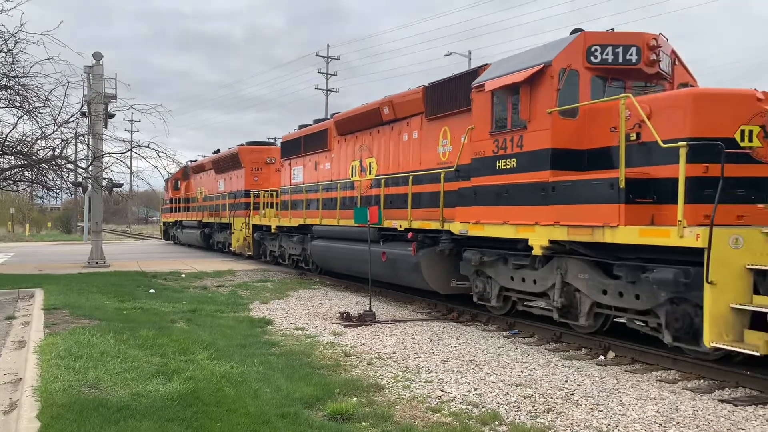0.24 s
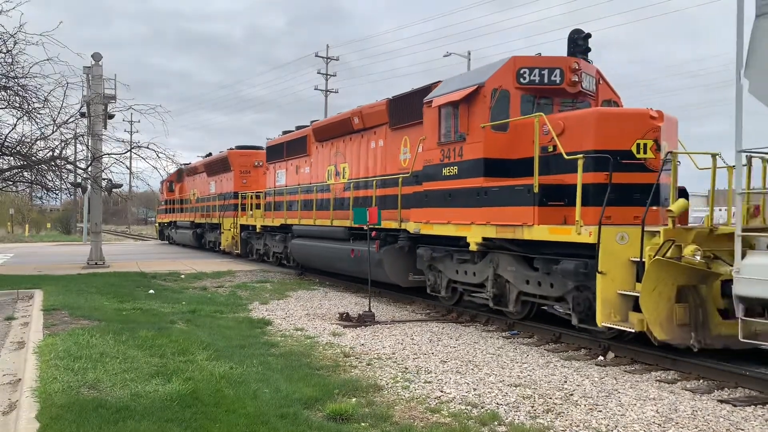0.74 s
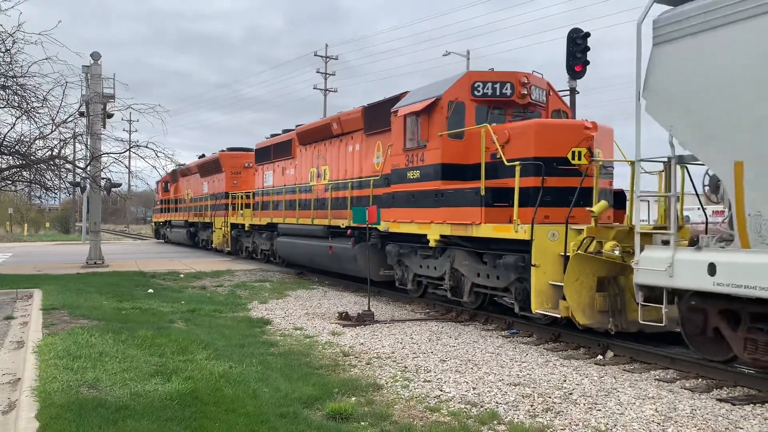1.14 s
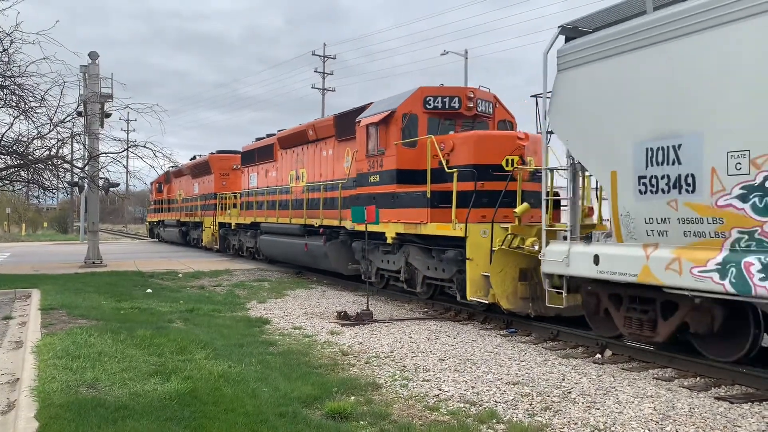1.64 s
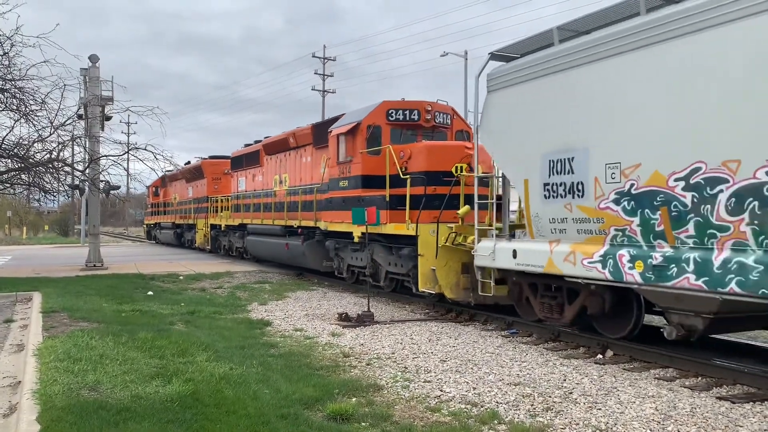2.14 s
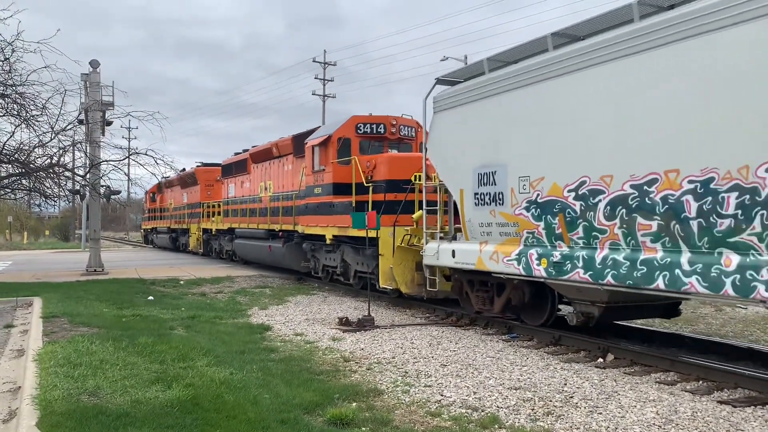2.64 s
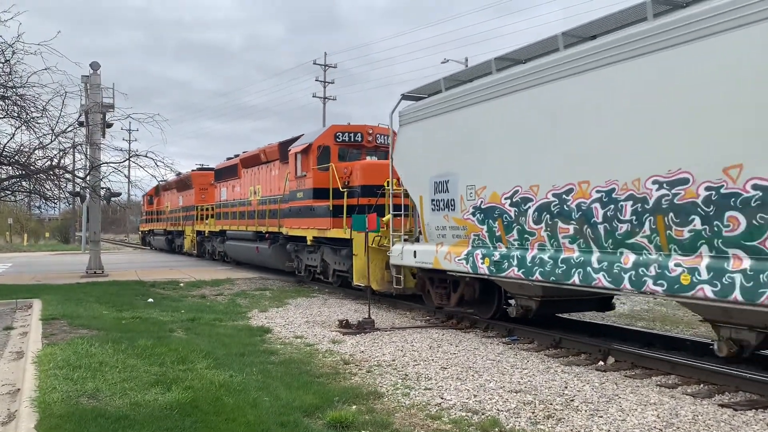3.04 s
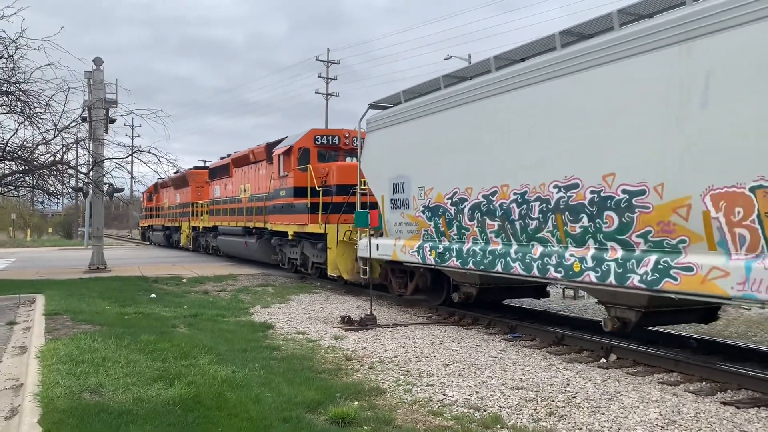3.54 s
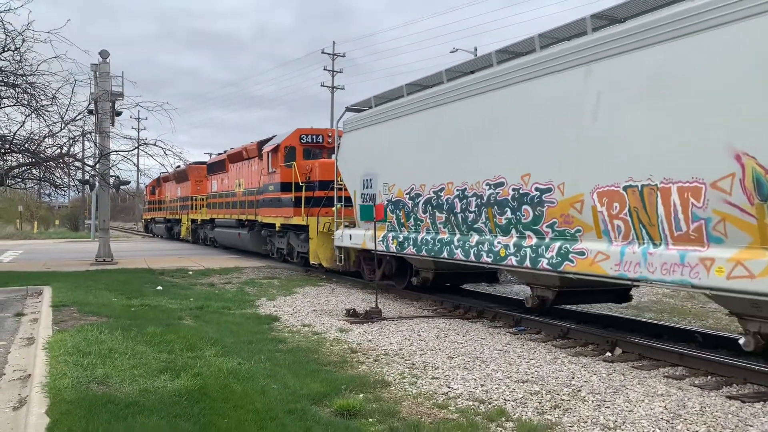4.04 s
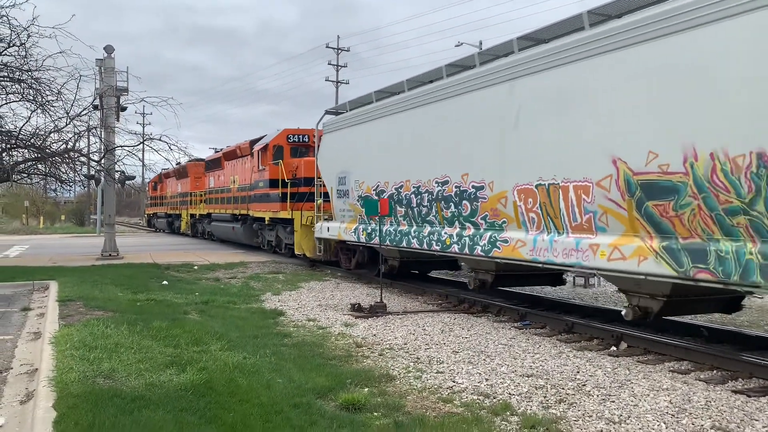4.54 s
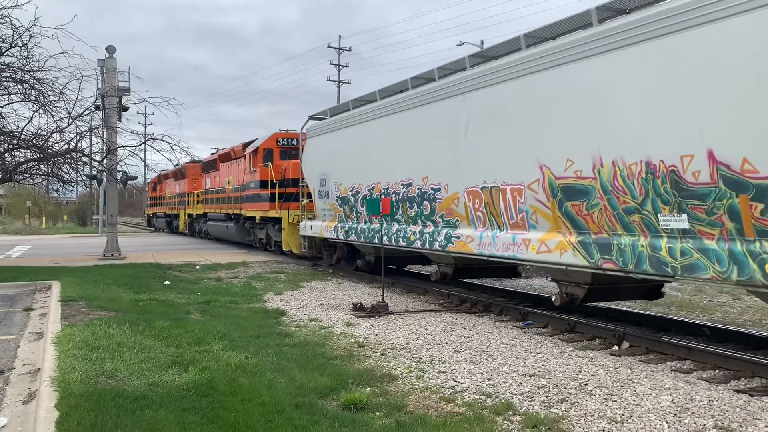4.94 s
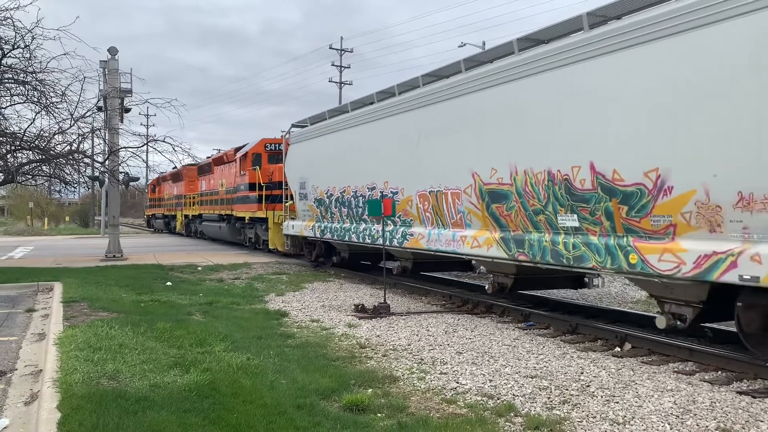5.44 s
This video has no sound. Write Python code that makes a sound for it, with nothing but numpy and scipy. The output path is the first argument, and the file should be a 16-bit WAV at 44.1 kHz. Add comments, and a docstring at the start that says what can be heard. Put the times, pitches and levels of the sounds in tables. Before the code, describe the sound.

Deep pulsing engine drone and rumble beside a railway line, hissing air, then freight wagon wheels clanking and briefly squeaking as they roll by.

```python
"""Slow freight train pulling away

Two diesel locomotives pull a slow freight train over a level crossing, heard from the grass beside the line.
The exhaust throbs as sines on two neighbouring crank orders, echoed off a wagon side; gears and motors add tones.
Shaped noise makes the rumble, rolling, leaking air, blower whistle and valve spits.
Wagon wheels knock over rail joints, setting steel modes ringing; flanges squeak and the wagon body hums.
Two microphone ports share part of the sound, less or more of it as the wagon takes over from the engines."""
import sys
import numpy as np
from scipy import signal
from scipy.fft import rfft, irfft
from scipy.io import wavfile
from scipy.ndimage import uniform_filter1d

SR = 44100
rng = np.random.default_rng(int(sys.argv[2]) if len(sys.argv) > 2 else 0)


def wav_out(sig):
    """Save sig, one row per channel (or a flat mono array), as 16-bit PCM at SR to the path in sys.argv[1]."""
    wavfile.write(sys.argv[1], SR, np.round(np.clip(np.atleast_2d(sig).T, -1, 1) * 32767).astype(np.int16))


N = 251811
T = np.arange(N) / SR  # time [s]
CRANK_HZ = 9.4047  # first engine


def gain_of(db):
    """Amplitude factor of a level in dB."""
    return 10 ** (np.asarray(db) / 20)


def evened(x):
    """Scale to an rms of one."""
    return x / np.sqrt(np.mean(x ** 2) + 1e-20)


def read(points, hz):
    """Read a table over frequency, straight between points on a logarithmic frequency axis."""
    f, value = np.transpose(points)
    return np.interp(np.log(hz + 1), np.log(f + 1), value)


def curve(rows, column):
    """Spread one column of a timed table over the whole scene."""
    columns = np.transpose(rows)
    return np.interp(T, columns[0], columns[column])


def add(mix, s, sound):
    """Lay a sound into the mix at s seconds, cut off at the end of the scene."""
    part = mix[..., round(s * SR):][..., :sound.shape[-1]]
    part += sound[..., :part.shape[-1]]


def drift(top_hz):
    """Slow chance: sines of random phase up to top_hz, rms one."""
    coarse = T[::64]
    rates = top_hz * np.geomspace(.1, 1, num=12)
    slow = sum(np.sin(2 * np.pi * (f * coarse + rng.random())) for f in rates)
    return np.interp(T, coarse, evened(slow))


def noise(gain, patchy_db, flicker_db, size=512):
    """Two unrelated noises from random short-time spectra, with shared patches and frame-wide flicker."""
    frames, hz = N // (size // 4) + 5, np.fft.rfftfreq(size, 1 / SR)
    shape = (2, frames, len(hz))
    spectra = rng.standard_normal(shape) + 1j * rng.standard_normal(shape)
    patches = uniform_filter1d(rng.standard_normal((frames, len(hz))), size=12, axis=0)
    patches = evened(uniform_filter1d(patches, size=6, axis=1))
    flicker = evened(uniform_filter1d(rng.standard_normal((frames, 1)), size=4, axis=0))
    spectra = spectra * gain(hz) * gain_of(patchy_db * patches + flicker_db * flicker)
    sound = signal.istft(spectra.transpose(0, 2, 1), nperseg=size, noverlap=3 * size // 4)[1]
    return evened(sound[:, :N])


def tone(db, cycles):
    """A turning phasor whose real part is a steady tone."""
    return gain_of(db) * np.exp(2j * np.pi * cycles)


def at_ports(phasor, leads, louder):
    """Give the right port's unshared part a share that leads the left and a share that is louder."""
    return np.array([phasor.real, leads * phasor.real + louder * phasor.imag])


def exhaust():
    """Sines on crank orders: the strong two beat once per turn and meet a growing echo; a second engine slips past."""
    # strong tones: (time [s], echo of eighth order [dB], echo of ninth order [dB],
    # second engine [dB], second engine crank speed [Hz])
    strong = [(0.0, -51.4, -54.6, -37.2, 9.524), (1.2, -41.0, -55.0, -37.7, 9.54),
              (2.0, -31.4, -47.5, -29.6, 9.476), (2.6, -25.2, -34.8, -43.9, 9.4),
              (3.1, -20.0, -27.7, -39.0, 9.462), (3.5, -18.5, -26.7, -32.5, 9.522),
              (4.1, -17.3, -25.1, -45.0, 9.455), (4.7, -18.2, -24.1, -26.3, 9.507),
              (5.2, -17.9, -23.8, -26.7, 9.474), (5.71, -15.4, -23.3, -22.1, 9.4)]
    # weaker tones: (multiple of the crank speed, level at start [dB], in the middle [dB], at the end [dB])
    orders = [(5, -54, -52, -50), (6, -53, -43, -44), (7, -47, -42, -41), (10, -48, -45, -47),
              (11, -53, -43, -50), (12, -55, -48, -53), (13, -56, -53, -57), (14, -58, -49, -42),
              (15, -62, -50, -49), (16, -49, -47, -46), (17, -51, -51, -48), (18, -60, -54, -52),
              (19, -57, -56, -54), (20, -49, -51, -45), (23, -59, -58, -53), (24, -54, -56, -55),
              (27, -60, -58, -60), (30, -54, -54, -56)]
    eighth_db, ninth_db = -28.5, -28.7  # heard directly
    ninth_lead, orders_lead = .075, .1  # cycles
    locked_up_to = 10  # the pipes scatter the timing of orders above this one
    echo_s, echo_s_per_s = .0022, .0012  # the detour by the wagon side lengthens
    second_lag = .602  # crank turns behind the first engine

    direct = CRANK_HZ * T
    echo = CRANK_HZ * (T - echo_s - echo_s_per_s * T)
    second = np.cumsum(curve(strong, 4)) / SR - second_lag
    from_engine = tone(eighth_db, 8 * direct) + tone(ninth_db, 9 * direct + ninth_lead)
    from_wagon = tone(curve(strong, 1), 8 * echo) + tone(curve(strong, 2), 9 * echo + ninth_lead)
    from_second = tone(curve(strong, 3), 8 * second)
    out = at_ports(from_engine, leads=-.3, louder=.6)
    out = out + at_ports(from_wagon, leads=.8, louder=.25)
    out = out + at_ports(from_second, leads=.9, louder=.6)
    for order, *levels_db in orders:
        lead = orders_lead if order <= locked_up_to else rng.random()
        level_db = np.interp(T, [0, T[-1] / 2, T[-1]], levels_db) + 2.5 * drift(top_hz=1.3)
        cycles = order * echo + lead + 0.088 * drift(top_hz=1.296)
        out = out + gain_of(level_db) * np.cos(2 * np.pi * cycles)
    return np.sqrt(2) * out  # the levels are rms


def roar():
    """Shaped noise for engine rumble, the rolling of steel on steel with its fine hiss, and leaking brake air."""
    # spectra, each of them: (frequency [Hz], relative density [dB per Hz])
    rumble_colour = [(30, -43), (60, 4.5), (120, -3), (200, -1), (350, -3.5), (500, -7.5), (900, -37),
                     (2000, -52.5)]
    rolling_colour = [(200, -15), (500, -10), (700, -0.5), (1000, -0.5), (1500, -7.5), (2000, -9),
                      (2700, -12.5), (3200, -14.5), (5000, -29)]
    hiss_colour = [(1500, -1), (3000, 2.5), (4600, 3), (6000, -6.5), (7500, 1), (10000, -54), (14000, -24)]
    leak_colour = [(6000, -75), (9500, -8.5), (11000, -10), (13000, -18), (14500, -22), (15200, -14),
                   (15700, -0.5)]
    # rolling noise swells as each set of wheels passes: (time [s], level [dB])
    wheels_passing = [(0, -48.5), (.54, -47.5), (.9, -49), (1.5, -48.5), (1.8, -47.5), (2.1, -48.5),
                      (2.35, -46), (2.64, -48.5), (3.2, -45.5), (3.5, -48.5), (3.78, -47.5), (3.95, -46.5),
                      (4.1, -45.5), (4.45, -45), (4.88, -43.5), (5.18, -48), (5.44, -44.5), (5.71, -44.5)]
    # air leak: (time [s], level [dB])
    leak_level = [(0, -54), (.3, -53.5), (1., -55.5), (1.4, -55), (2.1, -50.5), (2.7, -56), (3.3, -51),
                  (3.75, -54.5), (4.1, -46.5), (4.25, -50.5), (4.85, -46), (5.1, -56), (5.4, -44),
                  (5.55, -58), (5.71, -47)]
    mean_db = -47  # the swells are counted from this level
    # against the rolling noise: offset, share of the swell followed, climb
    rumble_over_db, rumble_follows, rumble_db_per_s = 9, 0.72, 0.05
    hiss_over_db, hiss_follows, hiss_db_per_s = -10.5, 0.97, 0.55
    next_wheels_s, next_wheels_db_per_s = 5.5, 12  # the rumble climbs as the next wheels come near

    rumble = noise(lambda hz: gain_of(read(rumble_colour, hz)), patchy_db=2.2, flicker_db=.8, size=4096)
    rolling = noise(lambda hz: gain_of(read(rolling_colour, hz)), patchy_db=2.0, flicker_db=0.5, size=1024)
    hiss = noise(lambda hz: gain_of(read(hiss_colour, hz)), patchy_db=3.0, flicker_db=1.0)
    leak = noise(lambda hz: gain_of(read(leak_colour, hz)), patchy_db=2.5, flicker_db=1.5)
    swell_db = curve(wheels_passing, 1) - mean_db
    rumble_db = rumble_over_db + rumble_follows * swell_db + rumble_db_per_s * T
    rumble_db = rumble_db + next_wheels_db_per_s * np.maximum(T - next_wheels_s, 0)
    hiss_db = hiss_over_db + hiss_follows * swell_db + hiss_db_per_s * T
    train = gain_of(rumble_db) * rumble + gain_of(swell_db) * rolling + gain_of(hiss_db) * hiss
    return gain_of(mean_db) * train + gain_of(curve(leak_level, 1)) * leak


def blower():
    """Turbulent air through two close resonances: a breathy whistle that pulses a little with the firing."""
    # resonances: (frequency [Hz], width [Hz], relative level [dB])
    resonances = [(7790, 330, -3), (8050, 260, 0)]
    # whistle: (time [s], level [dB])
    whistle = [(0, -51.5), (.5, -46.5), (.9, -49), (1.2, -47), (1.55, -48), (1.8, -48.5), (2.3, -47),
               (2.65, -53), (3.1, -49), (3.5, -48), (3.8, -50.5), (3.93, -42), (4.4, -48), (4.7, -46),
               (4.88, -40), (5.2, -49), (5.71, -49.5)]

    def colour(hz):
        return sum(gain_of(db) / (1 + ((hz - f) / w) ** 2) ** 2 for f, w, db in resonances)

    firing = 1 + .1 * np.cos(2 * np.pi * 8 * CRANK_HZ * T)
    return gain_of(curve(whistle, 1)) * firing * noise(colour, patchy_db=2.0, flicker_db=1.5)


def gears():
    """Wavering gear and fan tones and a beating motor whine; levels change as the wagon moves in front of them."""
    # gears and fans: (frequency [Hz], level in the open [dB], screened by the wagon [dB], at the end [dB])
    tones = [(743, -59, -59, -64), (947, -66, -65, -64), (1061, -67, -69, -63), (1354, -69, -70, -68),
             (1484, -67, -67, -62), (2713, -70, -77, -79), (3321, -82, -79, -74), (4068, -72, -80, -76)]
    screen_s, screen_takes_s, clear_s, clear_takes_s = 1.8, .3, 4.1, .5
    whine_hz, whine_open_db, whine_screened_db = 2650, -67, -71  # two traction motors
    beat_hz, in_beat_s = 1.4, .65  # their pitch gap and a moment when they add up
    second_motor = .8  # amplitude against the first

    screened = np.clip((T - screen_s) / screen_takes_s, 0, 1)
    late = np.clip((T - clear_s) / clear_takes_s, 0, 1)
    cycles = whine_hz * T + .17 * drift(top_hz=6)
    second_cycles = cycles + beat_hz * (T - in_beat_s)
    pair = np.cos(2 * np.pi * cycles) + second_motor * np.cos(2 * np.pi * second_cycles)
    out = gain_of(whine_open_db + (whine_screened_db - whine_open_db) * screened) * pair
    for hz, open_db, screened_db, end_db in tones:
        level_db = open_db + (screened_db - open_db) * screened + (end_db - screened_db) * late
        level = gain_of(level_db + 3 * drift(top_hz=7))
        out = out + level * np.cos(2 * np.pi * (hz * T + 0.17 * drift(top_hz=7)))
    return np.sqrt(2) * out


def ring(modes, pitch_hz=None):
    """The response of a steel part to one blow; the load on the wheels damps it quickly."""
    off_pitch_db = -12  # modes an octave from the favoured pitch ring this much weaker
    t = np.arange(8000) / SR
    out = np.zeros(len(t))
    for hz, db, t60 in modes:
        off_db = off_pitch_db * abs(np.log2(hz / pitch_hz)) if pitch_hz else 0
        fall_db = -60 * t / np.clip(t60, .01, .25)
        out += gain_of(db + off_db + fall_db) * np.sin(2 * np.pi * hz * t)
    return out / np.sqrt(len(modes))


def knocks():
    """Each jolt is a short rattle of random small blows into the wagon body and the wheels."""
    # wheels over rail joints and slack in the couplings: (time [s], relative thud level [dB],
    # relative clang level [dB], length of the rattle [s], body pitch that rings most [Hz])
    jolts = [(0.382, -24.5, -42, 0.014, 215), (1.333, -31, -42.5, 0.02, 460), (1.559, -20, -59, 0.022, 165),
             (1.753, -31, -44, 0.011, 425), (1.858, -25.5, -37, 0.017, 398), (2.309, -36, -37, 0.054, 302),
             (2.92, -29.5, -35, 0.036, 560), (3.202, -32.5, -34, 0.11, 420),
             (3.426, -27.5, -35, 0.022, 280), (3.68, -21.5, -27.5, 0.099, 590),
             (3.747, -39, -33, 0.024, 315), (3.772, -23.5, -35, 0.11, 287),
             (3.982, -27.5, -37.5, 0.043, 307), (4.088, -30, -39.5, 0.0081, 297),
             (4.33, -31, -41, 0.023, 330), (4.575, -28, -33.5, 0.015, 525), (4.716, -24, -35, 0.057, 392),
             (5.356, -32, -30.5, 0.09, 480), (5.488, -19, -33.5, 0.057, 222), (5.597, -29, -54, 0.03, 258)]
    # modes of the wagon body: (frequency [Hz], relative level [dB], 60 dB decay before limits [s])
    body_modes = [(169, 4, 0.14), (208, 0, 0.09), (283, 7, 0.1), (307, -1.5, 0.17), (345, 1.5, 0.29),
                  (395, -1.5, 0.09), (439.7, 6.5, 0.083), (474, 6.5, 0.091), (547, -0.5, 0.038),
                  (581, 8, 0.048), (607, 2, 0.049), (800, -1, 0.042)]
    # modes of a wheel: (frequency [Hz], relative level [dB], 60 dB decay before limits [s])
    wheel_modes = [(1400, 11.5, 0.01), (1907, 8, 0.025), (2090, 2, 0.027), (2184, 0, 0.035),
                   (2364, 5.5, 0.039), (2530, 5.5, 0.028), (3280, 5.5, 0.011), (3980, -3, 0.028),
                   (4410, -2.5, 0.017), (10000, 2.5, 0.0093)]
    rise_s, rise_share = .016, .4  # long rattles build up over this share of their length
    lumpy_db = 3  # the blows of a rattle come in uneven clumps

    out, t, wheel = np.zeros((2, N)), np.arange(6000) / SR, ring(wheel_modes)
    for s, thud_db, clang_db, length, pitch_hz in jolts:
        clumps = gain_of(lumpy_db * evened(uniform_filter1d(rng.standard_normal(len(t)), size=150)))
        rise = np.minimum(t / max(rise_s, rise_share * length), 1)
        fall = np.exp(-t / np.clip(length, .003, .08))
        rattle = clumps * rng.standard_normal((2, len(t))) * rise * fall
        rattle = rattle / np.linalg.norm(rattle[0])
        steel = gain_of(thud_db) * ring(body_modes, pitch_hz) + gain_of(clang_db) * wheel
        add(out, s, signal.fftconvolve(rattle, steel[None], axes=1))
    return out


def spits():
    """Short puffs of compressed air, with a weaker tail thrown back by the wagon sides."""
    # air valves: (time [s], level before the envelope [dB], brightness [dB per octave],
    # pitch of the valve's hollow note [Hz])
    puffs = [(0.403, -42, 0.1, 6000), (0.49, -32, 1.5, 4370), (0.5654, -32, 1.1, 4600),
             (1.193, -33.5, 2, 7450), (1.858, -33.5, 1.5, 4500), (1.929, -36, 1.5, 4500),
             (2.852, -38.5, -3, 6000), (2.934, -46, 0.1, 4500), (3.038, -33, 0.5, 4500),
             (3.1625, -25.5, 1.2, 3440), (3.5896, -33, 0.5, 5900), (4.35, -34.5, 1, 4200),
             (4.502, -38, 1, 4460), (5.2645, -32.5, -4, 4500)]
    # spectrum of the air: (frequency [Hz], relative density [dB per Hz])
    air_colour = [(1500, -24), (3500, -3.5), (4600, -3), (6500, -5), (9000, 7), (12000, 5), (16000, -2.5)]
    rise_s, puff_t60 = 0.003, 0.024  # seconds
    slap_db, slap_t60, tail_db, tail_t60 = -11.5, 0.12, -27.5, 0.66
    nozzle_db, nozzle_width_hz = 7.5, 330  # height and width of the hollow note

    out, t = np.zeros((2, N)), np.arange(8192) / SR
    hz = np.fft.rfftfreq(len(t), 1 / SR)
    fall = gain_of(-60 * t / puff_t60)
    fall = fall + gain_of(slap_db - 60 * t / slap_t60) + gain_of(tail_db - 60 * t / tail_t60)
    octaves = np.log2(np.clip(hz, 1500, None) / 8000)
    for s, db, bright_db, note_hz in puffs:
        nozzle = 1 / (1 + ((hz - note_hz) / nozzle_width_hz) ** 2)
        colour = gain_of(read(air_colour, hz) + bright_db * octaves + nozzle_db * nozzle)
        air = evened(irfft(rfft(rng.standard_normal((2, len(t)))) * colour))
        add(out, s, gain_of(db) * air * np.minimum(t / rise_s, 1) * fall)
    return out


def squeaks():
    """Brief flange tones and body hums, roughened by stick and slip."""
    # wheel flanges: (time [s], length [s], frequency [Hz], peak level [dB])
    flange = [(2.483, 0.055, 6350, -56), (3.003, 0.054, 6360, -54), (3.812, 0.095, 2410, -51.5),
              (4.158, 0.045, 4460, -50), (4.22, 0.15, 4050, -57), (4.23, .04, 2710, -50.5),
              (4.362, 0.081, 6000, -50), (4.715, 0.047, 4080, -53), (5.488, 0.038, 2050, -46.5),
              (5.512, 0.026, 4030, -47)]
    # the loaded wagon body hums briefly: (time [s], length [s], frequency [Hz], peak level [dB])
    groans = [(0.997, 0.15, 253.4, -36), (3.101, 0.18, 276.4, -39), (3.737, 0.097, 287, -30.5),
              (4.257, 0.26, 340, -36), (4.598, 0.3, 352, -40), (5.5, 0.26, 188.4, -36.5)]
    out, t = np.zeros(N), np.arange(16000) / SR
    for s, length, hz, db in flange + groans:
        # lower tones waver more slowly
        slip = evened(uniform_filter1d(rng.standard_normal(len(t)), size=int(150 * 4000 / hz)))
        shape = np.sin(np.pi * np.clip(t / length, 0, 1))
        add(out, s, gain_of(db) * shape * np.sin(2 * np.pi * hz * t + 0.45 * slip))
    return out


def scene():
    """Row 0 is the sound at the left port, row 1 the part that reaches only the right one."""
    return exhaust() + roar() + blower() + gears() + knocks() + spits() + squeaks()


def record(dry):
    """The right port hears a shifted share of the left, changing as the train moves on; then the band limit."""
    # two microphone ports: (frequency [Hz], likeness of left and right with the engines in front [0-1],
    # lead of the right port then [rad], likeness with the wagon alongside [0-1], lead then [rad])
    ports = np.array([(95, .991, 0, .991, 0), (140, .96, -.25, .95, -.25), (270, .93, -.2, .75, .2),
                      (400, .88, -.2, .72, .5), (600, .6, .5, .7, 1.6), (850, .7, -.4, .25, -.2),
                      (1200, .7, -.3, .2, -1.4), (1800, .08, -.8, .75, -2.9), (2300, .6, -.8, .35, -1.2),
                      (3300, .38, -1.7, .38, -2.3), (3950, .24, -.3, .5, .3), (5500, .28, 2.2, .25, 2.4),
                      (6300, .55, 0, .25, 0), (7200, .5, .6, .5, .6), (7700, .95, 0, .97, 0),
                      (11000, .8, -.2, .82, -.2), (16000, .7, 0, .99, .2)])
    # balance of the ports: (frequency [Hz], left minus right [dB])
    lean = [(60, -0.5), (400, -0.9), (1200, 1.1), (1900, -.5), (4000, -1.3), (5600, -2.5), (7300, 0.2)]
    alongside_from_s, alongside_at_s = .9, 4.6  # the wagon takes over from the engines
    in_step_hz, turn_hz = 6150, 4750  # above the first, the right leads by one more cycle every turn_hz
    edge_hz = 15800

    hz, t, (left, apart) = signal.stft(dry, SR, nperseg=2048, noverlap=1536)
    along = np.clip((t - alongside_from_s) / (alongside_at_s - alongside_from_s), 0, 1)
    same, lead, same_late, lead_late = (read(ports[:, [0, column]], hz)[:, None] for column in (1, 2, 3, 4))
    same = same + along * (same_late - same)
    lead = lead + along * (lead_late - lead)
    lead = lead + 2 * np.pi * np.maximum(hz[:, None] - in_step_hz, 0) / turn_hz
    # the unshared part arrives a quarter cycle off, so steady tones keep their level
    right = same * left + 1j * np.sqrt(1 - same ** 2) * apart
    right = gain_of(-read(lean, hz))[:, None] * np.exp(1j * lead) * right
    pair = signal.istft(np.array([left, right]), SR, nperseg=2048, noverlap=1536)[1][:, :N]
    band_limit = signal.firwin(1023, edge_hz, window=("kaiser", 9), fs=SR)
    return signal.oaconvolve(pair, band_limit[None], "same", axes=1)


dry = scene()
out = record(dry)
wav_out(out)
```